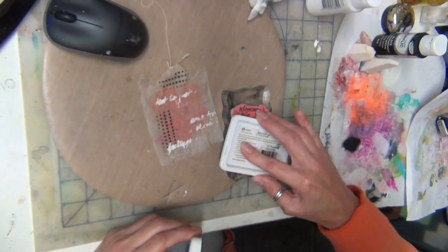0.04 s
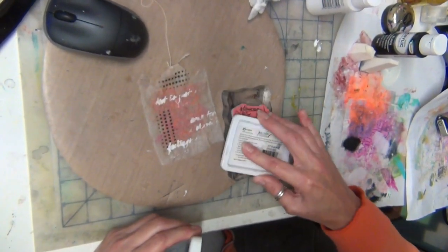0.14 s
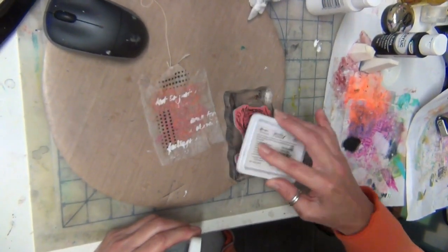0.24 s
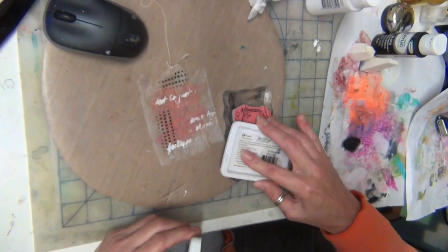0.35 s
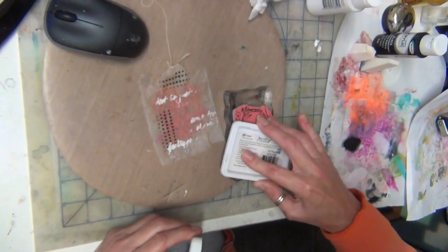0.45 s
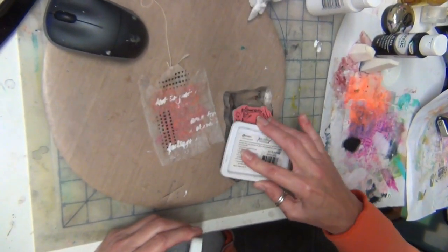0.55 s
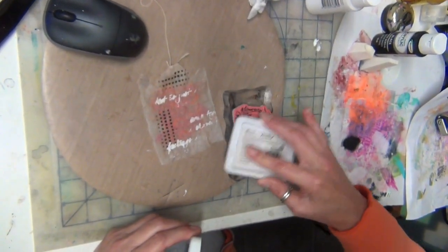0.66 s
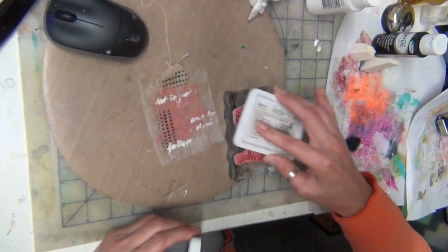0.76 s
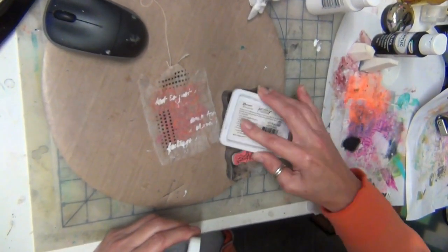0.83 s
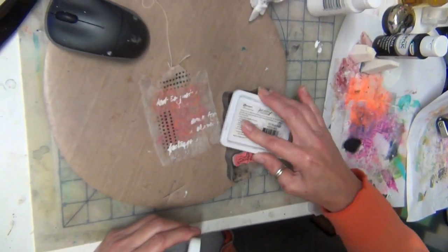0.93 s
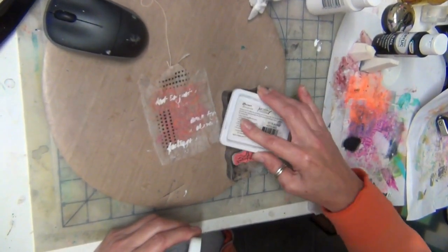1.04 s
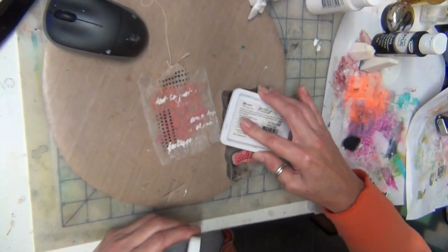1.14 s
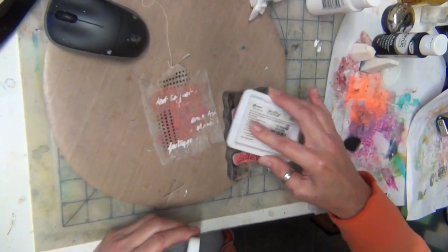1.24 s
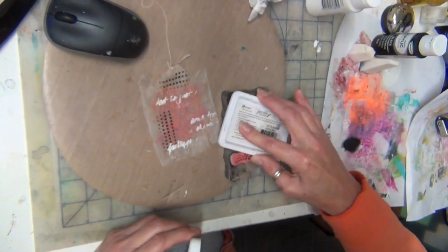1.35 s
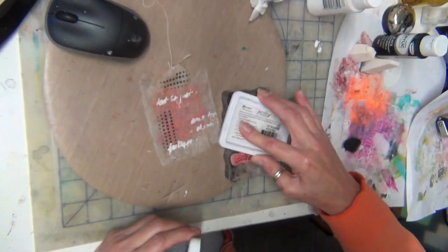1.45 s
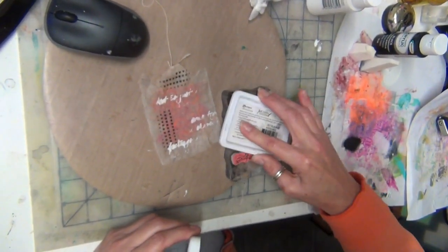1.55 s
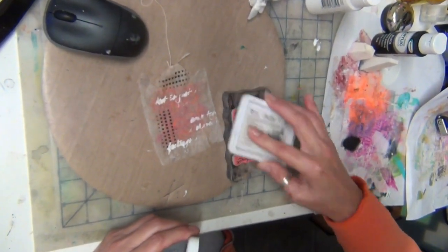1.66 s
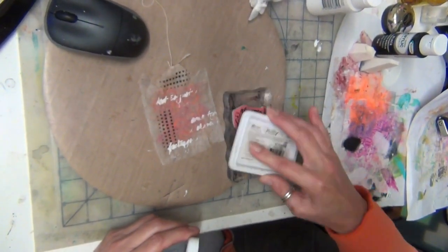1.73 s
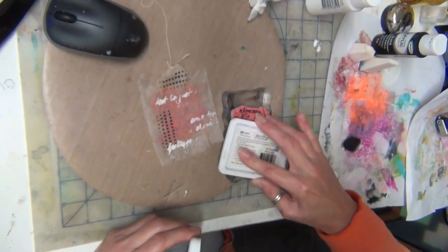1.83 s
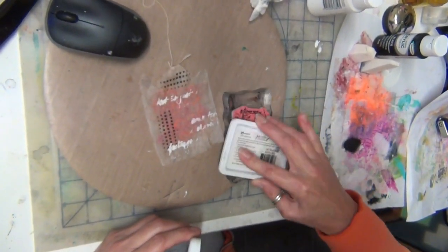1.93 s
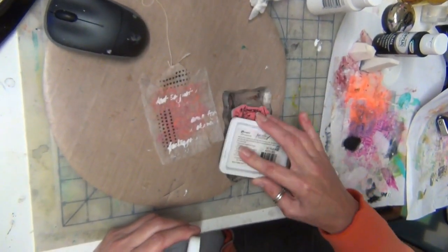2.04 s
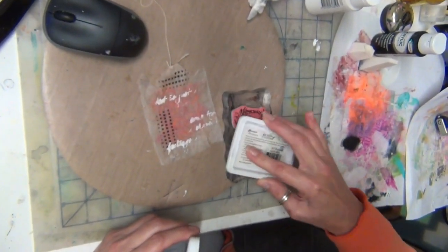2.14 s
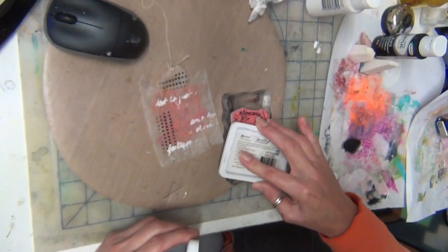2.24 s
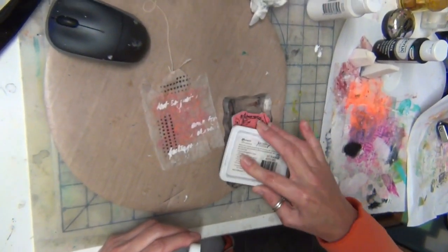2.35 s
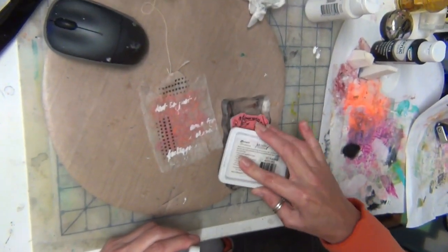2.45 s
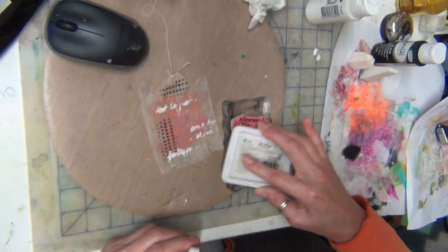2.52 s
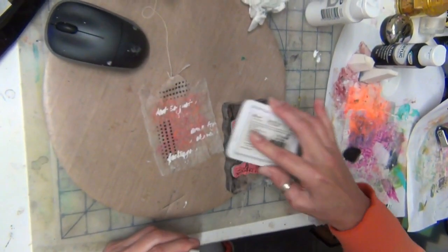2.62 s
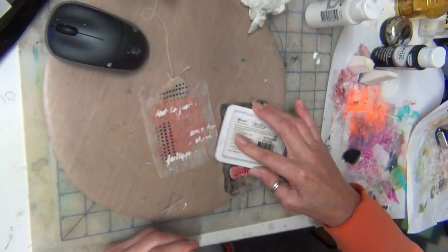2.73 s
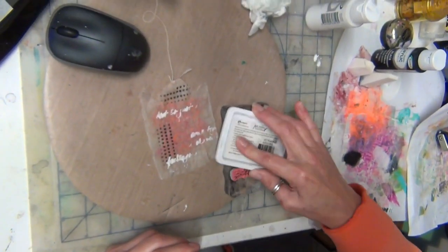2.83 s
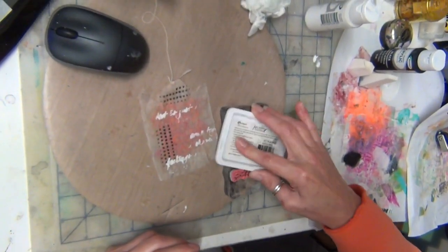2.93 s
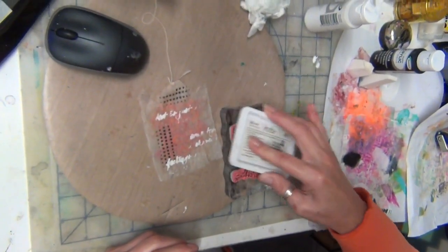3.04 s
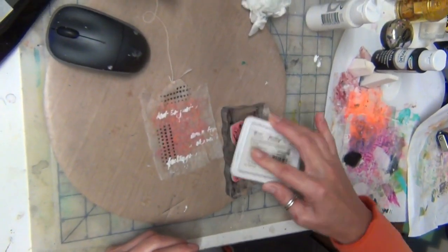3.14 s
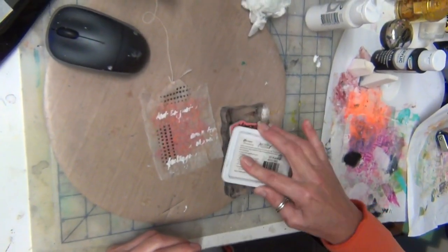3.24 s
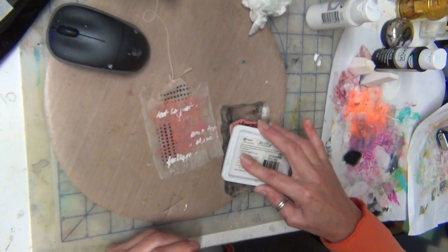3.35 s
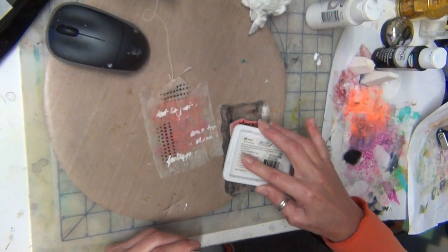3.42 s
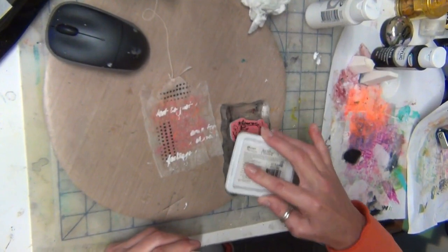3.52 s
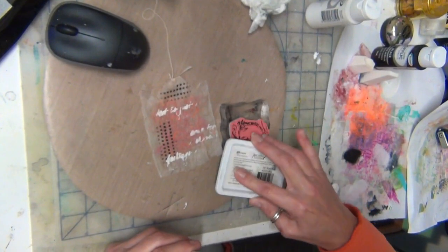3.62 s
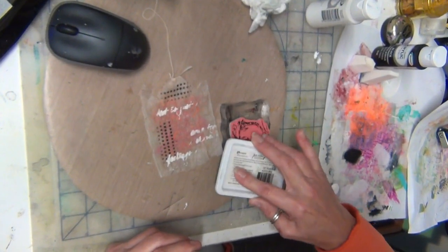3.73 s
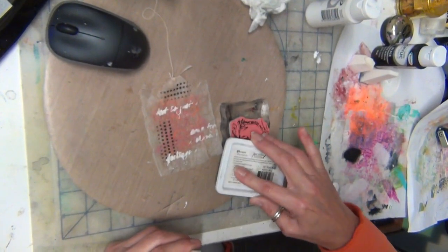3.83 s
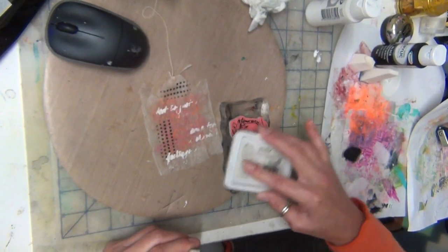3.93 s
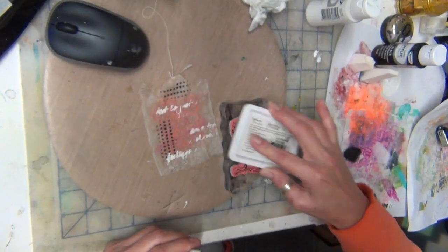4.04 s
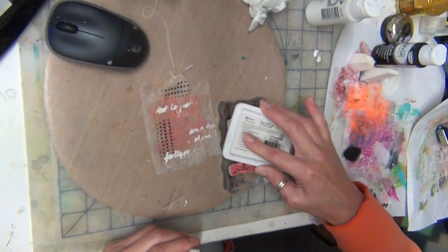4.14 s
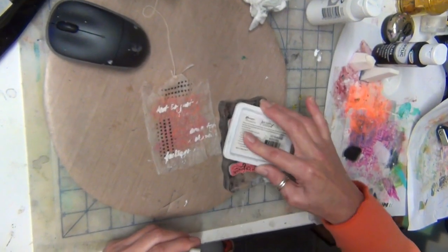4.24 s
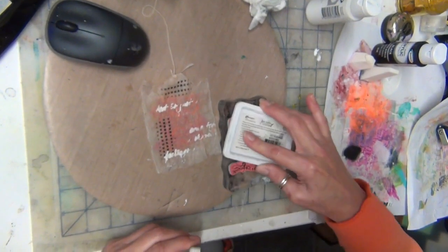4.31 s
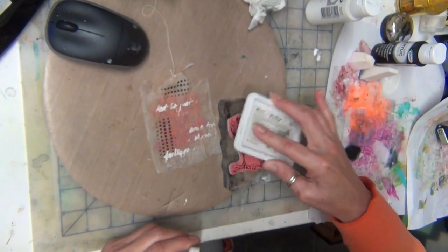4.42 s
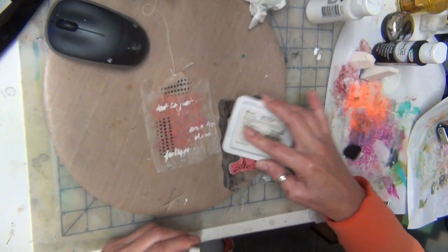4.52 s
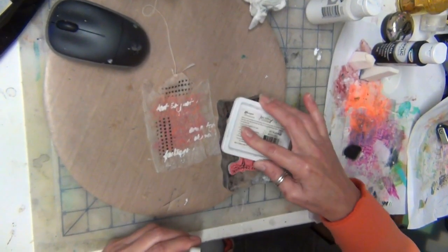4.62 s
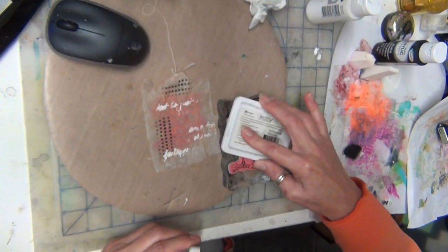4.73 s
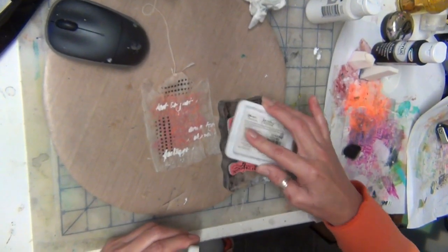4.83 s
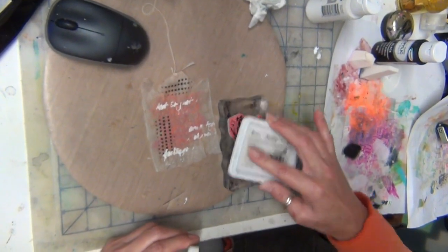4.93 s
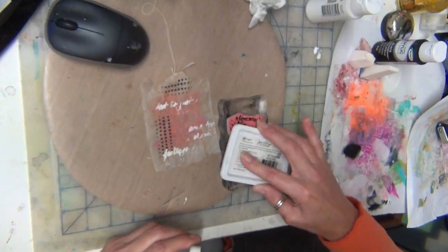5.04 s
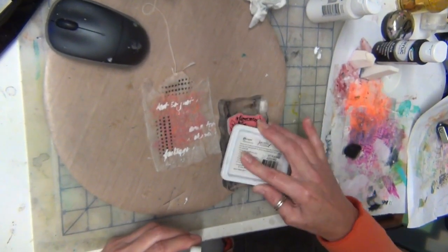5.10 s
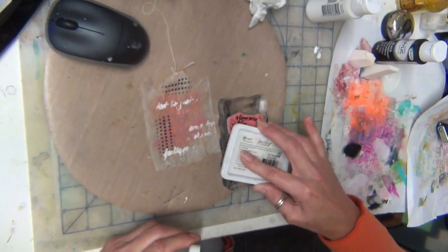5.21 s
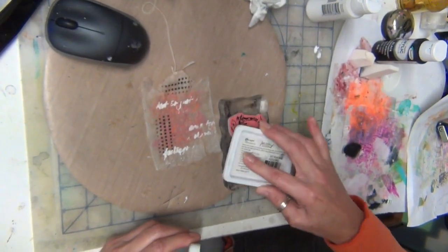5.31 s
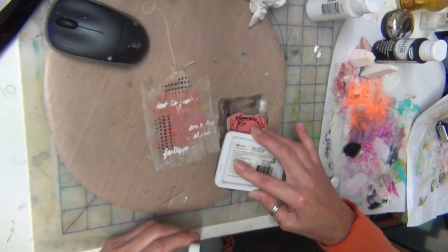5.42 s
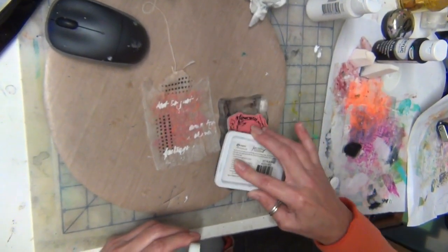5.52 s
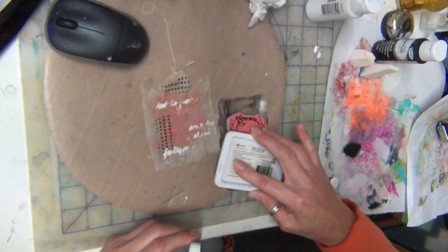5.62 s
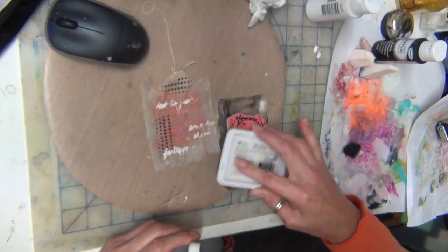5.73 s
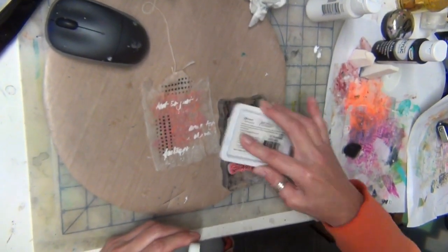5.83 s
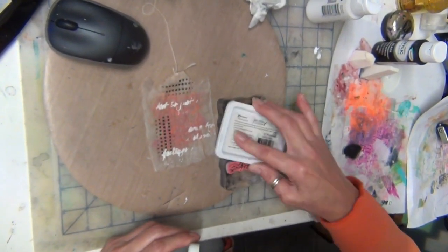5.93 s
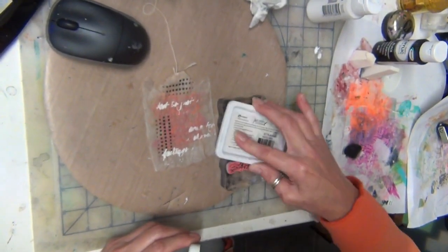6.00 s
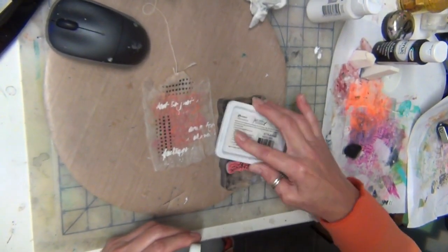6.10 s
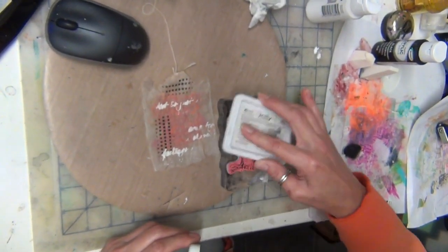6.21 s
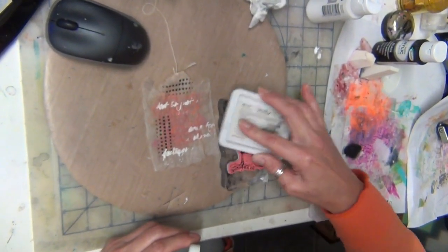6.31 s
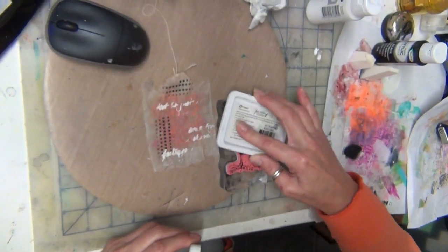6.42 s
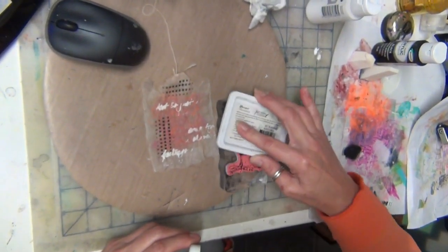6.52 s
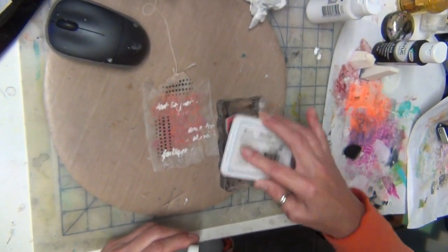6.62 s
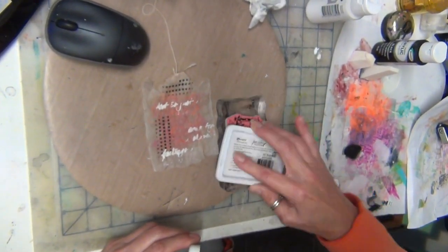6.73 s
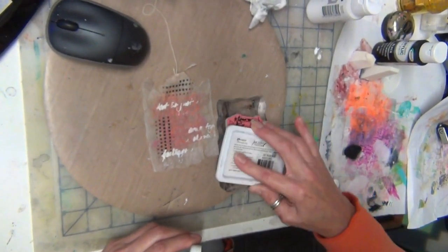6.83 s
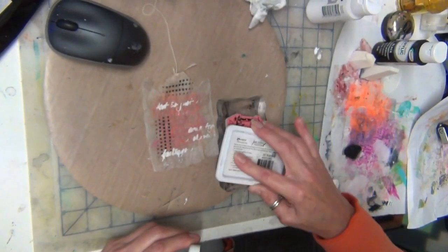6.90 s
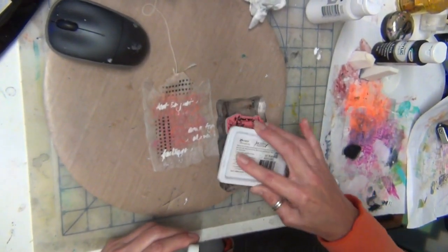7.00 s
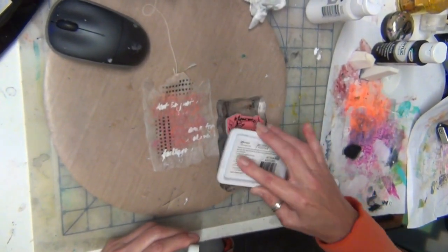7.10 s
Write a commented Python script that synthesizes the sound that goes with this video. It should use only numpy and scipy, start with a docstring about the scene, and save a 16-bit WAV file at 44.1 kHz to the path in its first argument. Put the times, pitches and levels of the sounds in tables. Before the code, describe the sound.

Close, dry taps of a small plastic ink pad on a rubber stamp mounted on a clear block, about two each second. Each is a tight cluster of tiny contacts with a dull, hollow thud from pad and table. Faint sticky ticks follow as the pad lifts. Small room, overhead microphone, steady low hiss with a tiny mechanical whirr.

```python
"""A plastic ink pad is dabbed fifteen times onto a rubber stamp on an acrylic block, on a craft table.
Each dab is three noise contacts (near edge, far edge, settling flat) that drive case modes and snap,
plus a thud of damped table, pad-hollow and block modes. A quarter second later the tacky ink lets go
in a noise burst; sometimes the case ticks. A small room adds an echo and a tail.
A camera's drive ticks and whirrs faintly under steady coloured noise."""
import sys
import numpy as np
from scipy import signal
from scipy.fft import rfft, irfft, next_fast_len
from scipy.io import wavfile

SR = 44100
rng = np.random.default_rng(int(sys.argv[2]) if len(sys.argv) > 2 else 0)


def waveform_to_disk(signal):
    """Save audio, clipped to [-1, 1], as 16-bit WAV at the path in sys.argv[1]."""
    frames = np.transpose(np.atleast_2d(signal))
    scaled = np.clip(frames, -1, 1) * 32767
    samples = np.round(scaled).astype(np.int16)
    wavfile.write(sys.argv[1], SR, samples)


N = 315748
RING_S = 0.6
T = np.arange(int(RING_S * SR)) / SR

# dabs: push t/s, rock to far edge/s, near edge level/dB, far edge level/dB, snap level/dB, clack f/Hz,
# table bump level/dB, table top level/dB, pad hollow level/dB, block level/dB
DAB_EVENTS = [(0.399, 0.0037, -44, -38, -40.5, 1460, -49.5, -47, -46, -61),
              (0.8998, 0.0047, -29, -34, -44, 1030, -49, -44, -37, -39),
              (1.3724, 0.0077, -36, -46, -42.5, 1590, -44, -43.5, -35.5, -41.5),
              (1.8622, 0.0037, -29, -29.5, -38, 1500, -47.5, -46, -44.5, -45),
              (2.288, .0042, -28, -36.5, -40, 1830, -44.5, -45.5, -47, -40.5),
              (2.7595, 0.006, -30, -26.5, -38, 1090, -45, -38, -28, -31.5),
              (3.264, 0.0058, -37.5, -31.5, -43, 1050, -47, -42, -38.5, -36.5),
              (3.667, 0.0058, -29, -33, -37, 1900, -48.5, -43, -44.5, -53),
              (4.144, 0.0072, -27, -34.5, -40.5, 1030, -46.5, -47, -34.5, -29.5),
              (4.6, 0.0058, -30, -31, -40, 1380, -50.5, -45.5, -31.5, -31),
              (5.0723, 0.0045, -36.5, -29, -36, 1630, -42.5, -51, -41.5, -49),
              (5.48, 0.0081, -24.5, -27.5, -33, 1370, -46, -39, -43.5, -53),
              (5.9432, 0.0065, -30.5, -34.5, -40.5, 1530, -52, -43.5, -33, -36.5),
              (6.364, .0062, -32, -33, -43.5, 1000, -47, -43.5, -27.5, -34),
              (6.785, 0.0041, -29.5, -41, -43, 1040, -61, -46, -40, -41)]
# modes of the pad's hollow: f/Hz, relative level/dB, t60/s
HOLLOW_MODES = [(352, -39, 0.85), (373, -33, 0.22), (395, 6.5, 0.035), (471, 4, 0.031), (480, -25, 0.12)]
# colour of the bright snap: f/Hz, gain/dB
SNAP_COLOUR = [(1800, 1), (3100, 1.5), (4500, -4), (6200, -9), (7600, -8.5), (10000, -14), (13000, -21.5),
               (16000, -35)]


def undb(db):
    """Decibels to amplitude gain."""
    return 10 ** (np.asarray(db) / 20)


def fade(t60_s):
    """Exponential decay, 60 dB in t60_s."""
    return np.exp(-np.log(1000) * T / t60_s)


def add(track, start_s, sound):
    """Mix a sound into a track, cut at the track's end."""
    i = int(start_s * SR)
    track[i:i + len(sound)] += sound[:len(track) - i]


def level(x, rms_db):
    """Scale to an rms level."""
    return x * undb(rms_db) / np.sqrt(np.mean(x ** 2))


def blow(x, rms_db, held_s):
    """Scale a short sound to the energy of an rms level held for held_s."""
    return x * undb(rms_db) * np.sqrt(held_s * SR / np.sum(x ** 2))


def colour(x, points):
    """Causal minimum-phase filter through (f/Hz, gain/dB) points, from the folded cepstrum."""
    size = next_fast_len(len(x) + 4096, real=True) // 2 * 2
    points_hz, points_db = np.transpose(points)
    bins_hz = np.arange(size // 2 + 1) * SR / size
    gain_db = np.interp(np.log(bins_hz + 1), np.log(points_hz), points_db)
    cepstrum = irfft(np.log(undb(gain_db)))
    cepstrum[1:size // 2] *= 2
    cepstrum[size // 2 + 1:] = 0
    response = np.exp(rfft(cepstrum))
    return irfft(rfft(x, size) * response)[:len(x)]


def ring(modes):
    """Sum of damped sines; each blow lands a little elsewhere and weights and tunes them anew."""
    scatter_db, detune_ratio = 1.2, 0.005
    chance = rng.standard_normal((len(modes), 2))
    out = 0
    for (f_hz, mode_db, t60_s), (louder, sharper) in zip(modes, chance):
        sine = np.sin(2 * np.pi * f_hz * (1 + detune_ratio * sharper) * T)
        out = out + undb(mode_db + scatter_db * louder) * sine * fade(t60_s)
    return out


def crack(t60_s):
    """Contact noise: a decaying white burst."""
    return rng.standard_normal(len(T)) * fade(t60_s)


def even(x):
    """Whiten a burst, keeping its phase: a broad contact excites all frequencies alike."""
    spectrum = rfft(x)
    white = irfft(spectrum / (np.abs(spectrum) + 1e-9), len(x))
    return white * fade(t60_s=0.2)


def cushion(x, rise_s):
    """Gradual onset, as a soft contact builds up the vibration."""
    return x * (1 - np.exp(-(T / rise_s) ** 2))


def stereo(mid, side):
    """Left and right from mid and side."""
    return np.array([mid + side, mid - side])


def steady_noise():
    """Room air and microphone hiss as coloured noise, plus narrow noise resonances that hum."""
    # broadband colour: f/Hz, gain/dB
    floor_colour = [(15, -45), (25, -10), (55, -0.5), (180, -10), (206, -7), (344, -12), (451, -8),
                    (560, -10), (796, -9), (887, -11.5), (1440, -9.5), (1700, -15.5), (2480, -16.5),
                    (2840, -22), (16000, -31)]
    # humming resonances: f/Hz, width/Hz, rms level/dB
    hums = [(58, 8.7, -81.5), (103.8, 3.6, -78), (360, 15, -79), (621, 33, -71), (895, 103, -66.5),
            (1310, 70, -77.5), (1708, 137, -68.5)]
    out = level(colour(rng.standard_normal(N), floor_colour), -63)
    for f_hz, width_hz, rms_db in hums:
        b, a = signal.iirpeak(f_hz, f_hz / width_hz, fs=SR)
        out = out + level(signal.lfilter(b, a, rng.standard_normal(N)), rms_db)
    return out


def drive():
    """The camera's drive turns steadily: four noise ticks and two tonal whirrs a cycle."""
    # tick colour: f/Hz, gain/dB
    drive_colour = [(900, -3), (1700, 2.5), (2500, 2), (3200, -0.5), (4800, -16), (8000, -32),
                    (15000, -12.5)]
    cycle_s, whirr_hz = 0.08, 2454
    # ticks in a cycle: t/s, relative level/dB
    beats = [(0.0075, -4.5), (0.0275, -13), (0.0475, 0), (0.0675, -12)]
    t = np.arange(N) / SR
    phase_s = t % cycle_s
    tick_envelope = sum(undb(db) * np.exp(-((phase_s - beat_s) / 0.0015) ** 2) for beat_s, db in beats)
    ticks = colour(tick_envelope * rng.standard_normal(N), drive_colour)
    whirr_envelope = np.exp(-((phase_s % (cycle_s / 2) - 0.024) / 0.0044) ** 2)
    # a random walk of phase makes the tone waver
    wander_rad = np.cumsum(0.11 * rng.standard_normal(N))
    turn_rad = 2 * np.pi * whirr_hz * t + wander_rad
    tone = np.sin(turn_rad) + undb(-11) * np.sin(2 * turn_rad)
    return level(ticks, -74) + level(whirr_envelope * tone, -73.5)


def room_tail():
    """Noise impulse response by bands, each with its own build-up and decay."""
    # bands: f/Hz, t60/s, level/dB, build-up/s
    tail_bands = [(80, 0.6, -30, .03), (198.5, 0.4, -8, 0.017), (445, 0.21, -15, 0.0067),
                  (857, 0.31, -10, 0.0017), (2240, 0.15, -12.5, 0.0015), (4130, 0.26, -10.5, 0.00043),
                  (9900, .18, -13.5, 0.00088)]
    tail = 0
    for f_hz, t60_s, band_db, rise_s in tail_bands:
        low_hz, high_hz = f_hz / 1.5, f_hz * 1.5
        band = signal.butter(3, [low_hz, min(high_hz, 0.45 * SR)], "band", fs=SR, output="sos")
        noise = signal.sosfilt(band, rng.standard_normal(len(T)))
        bandwidth_gain = np.sqrt(2 * (high_hz - low_hz) / SR)
        tail = tail + bandwidth_gain * blow(cushion(noise * fade(t60_s), rise_s), band_db, 1 / SR)
    return tail


def room(x):
    """A wall returns one dull echo; clutter adds a short tail, wide in the treble and late in the bass."""
    # echo colour: f/Hz, gain/dB
    echo_colour = [(100, -11.5), (380, -7.5), (490, -18), (700, -12), (1200, -26), (5000, -48)]
    # side of the tail: f/Hz, gain/dB
    tail_side = [(100, -56), (400, -19.5), (1000, -9.5), (5000, -6.5), (9000, -2.5), (15000, -26)]
    echo = np.zeros(N)
    add(echo, 0.022, colour(x, echo_colour))
    mid = signal.fftconvolve(x, room_tail())[:N]
    side = signal.fftconvolve(x, room_tail())[:N]
    return stereo(x + echo + mid, colour(side, tail_side))


def case_tick(tick_db):
    """The case flexes: small-wall modes plus a bright noise snap."""
    # case modes: f/Hz, relative level/dB, t60/s
    tick_modes = [(974, -3.5, 0.057), (1277, 1.5, 0.026), (1520, -6, 0.041), (1873, -5.5, 0.053),
                  (2370, -11, 0.047), (2360, 7.5, 0.014), (3112, 7.5, 0.011), (3416, -8.5, 0.038),
                  (3860, -6.5, 0.025), (4760, -5, 0.011), (5750, -9, 0.02), (6560, -29, .02),
                  (7100, -21, 0.021), (10830, -3, 0.0081)]
    # snap colour: f/Hz, gain/dB
    tick_colour = [(800, -26), (2300, -6), (4000, -0.5), (6000, -3.5), (8200, -5.5), (9600, -13),
                   (11000, -17), (13200, -13), (15000, -43)]
    modes = blow(cushion(ring(tick_modes), rise_s=0.00018), tick_db, 0.0027)
    snap = blow(colour(even(crack(t60_s=0.011)), tick_colour), tick_db - 5.5, 0.0042)
    # so small a wall radiates no bass
    return colour(modes + snap, [(500, -24), (900, -2)])


def ink_peel(peel_db):
    """Tacky ink lets go of the rubber: one snap, then a faint crackle of threads parting."""
    # colour: f/Hz, gain/dB
    peel_colour = [(800, -22), (2500, 1.5), (5000, -2), (7500, 2), (10000, 0), (15000, -15)]
    # cubing makes the noise sparse
    threads = rng.standard_normal(len(T)) ** 3 * fade(t60_s=0.24)
    parting = level(crack(t60_s=0.0044), 0) + level(threads, -1.5)
    return blow(colour(parting, peel_colour), peel_db, 0.006)


def block_nudge(nudge_db):
    """The block settles on the table: the hollow's modes and a faint snap."""
    modes = blow(ring(HOLLOW_MODES), nudge_db, 0.015)
    return modes + blow(colour(crack(t60_s=0.008), SNAP_COLOUR), nudge_db - 2, 0.003)


def lifts():
    """Lifting the pad: the case sometimes ticks, ink unsticks after every dab, the block shifts once."""
    # case ticks: t/s, level/dB before the bass cut
    tick_events = [(0.1869, -38), (0.6565, -39), (1.181, -39.5), (2.1166, -40), (4.8706, -34)]
    lift_after_s, lift_spread_s = 0.24, 0.012
    peel_db, peel_spread_db = -65, 3
    out = np.zeros(N)
    for tick_s, tick_db in tick_events:
        add(out, tick_s, case_tick(tick_db))
    for dab, (late, strong) in zip(DAB_EVENTS, rng.standard_normal((len(DAB_EVENTS), 2))):
        peel_s = dab[0] + lift_after_s + lift_spread_s * late
        add(out, peel_s, ink_peel(peel_db + peel_spread_db * strong))
    add(out, 2.513, block_nudge(-59))
    return out


def thud(bump_db, top_db, hollow_db, block_db):
    """The push of a dab rings the table, the hollow of the pad and the block."""
    # modes, all three: f/Hz, relative level/dB, t60/s
    bump_modes = [(62.3, -1.5, 0.44), (107.6, 21, 0.067)]
    top_modes = [(162.2, 3.5, 0.053), (183.7, -6, 0.098), (209.6, -0.5, 0.045), (236.4, -8, 0.071)]
    block_modes = [(606, -10.5, 0.094), (590, 5, 0.027), (678, -1.5, 0.05), (838, -6, 0.05),
                   (1046, -2, 0.025)]
    bump = blow(cushion(ring(bump_modes), rise_s=0.0032), bump_db, 0.039)
    top = blow(cushion(ring(top_modes), rise_s=0.0054), top_db, 0.029)
    hollow = blow(cushion(ring(HOLLOW_MODES), rise_s=0.0076), hollow_db, 0.03)
    block = blow(cushion(ring(block_modes), rise_s=0.0026), block_db, 0.013)
    return bump + top + hollow + block


def contact(clack_db, snap_db, clack_hz, scuff_s):
    """The felt scuffs, then an edge knocks the case and snaps where it meets something hard."""
    # case modes: f/Hz, relative level/dB, t60/s
    case_modes = [(1026, 14, 0.015), (1070, -15, 0.014), (1340, -7, 0.0054), (1527, 12, 0.017),
                  (1920, 7, 0.018), (2162, -5.5, 0.036), (2920, -4, 0.047)]
    # clack colour: f/Hz, gain/dB
    clack_colour = [(500, -37), (900, 4), (1400, 0), (2200, 1), (3000, -9.5), (4200, -32.5)]
    usual_snap_db = -8.5  # against the clack
    off_pitch_db, pitch_span = -5.5, 1.44
    force = level(cushion(crack(t60_s=0.026), rise_s=0.0052), -2)
    add(force, scuff_s, level(crack(t60_s=0.011), 0))
    force = even(force)
    case = signal.fftconvolve(force, ring(case_modes))[:len(T)]
    clack = level(colour(force, clack_colour), 0) + level(case, -2.8)
    # a soft contact, with little snap, also clacks lower
    tilt_db = np.clip(snap_db - clack_db - usual_snap_db, -10, 3)
    clack = colour(clack, [(1200, 0), (2500, tilt_db)])
    # the spot that lands favours one part of the case
    low_hz, high_hz = clack_hz / pitch_span, clack_hz * pitch_span
    clack = colour(clack, [(low_hz, off_pitch_db), (clack_hz, 0), (high_hz, off_pitch_db)])
    snap = blow(colour(force, SNAP_COLOUR), snap_db, 0.0043)
    return blow(clack, clack_db, 0.0011) + snap


def dabs():
    """Each dab is a thud and three contacts: near edge, far edge, then the pad settles flat."""
    give_s = 0.0024  # the felt gives before the near edge lands
    scuff_s = 0.004  # the felt scuffs ahead of each contact
    settle_s, settle_db = 0.0045, -4.5  # after and against the far edge
    snap_near_db, snap_far_db, snap_settle_db = -1.5, 2.5, -8.5
    snap_per_lean = 0.24  # dB of snap towards the harder edge, per dB of difference
    out = np.zeros(N)
    for push_s, rock_s, near_db, far_db, snap_db, clack_hz, *thud_dbs in DAB_EVENTS:
        add(out, push_s, thud(*thud_dbs))
        near_s = push_s + give_s - scuff_s
        far_s = near_s + rock_s
        lean_db = snap_per_lean * (far_db - near_db)
        near = contact(near_db, snap_db + snap_near_db - lean_db, clack_hz, scuff_s)
        far = contact(far_db, snap_db + snap_far_db + lean_db, clack_hz, scuff_s)
        settle = contact(far_db + settle_db, snap_db + snap_settle_db, clack_hz, scuff_s)
        add(out, near_s, near)
        add(out, far_s, far)
        add(out, far_s + settle_s, settle)
    return out


def scene():
    """The dabbing in its room, over the steady background."""
    # side of the steady noise: f/Hz, gain/dB
    floor_side = [(60, -40), (380, -16), (700, -16), (1290, -6.5), (4400, -6), (8100, -14), (15000, -28)]
    background = stereo(steady_noise() + drive(), colour(steady_noise(), floor_side))
    return room(dabs() + lifts()) + background


def record(dry):
    """A steep elliptic low-pass cuts the top above 15.8 kHz."""
    return signal.sosfilt(signal.ellip(10, 0.1, 70, 15800, fs=SR, output="sos"), dry)


dry = scene()
out = record(dry)
waveform_to_disk(out)
```